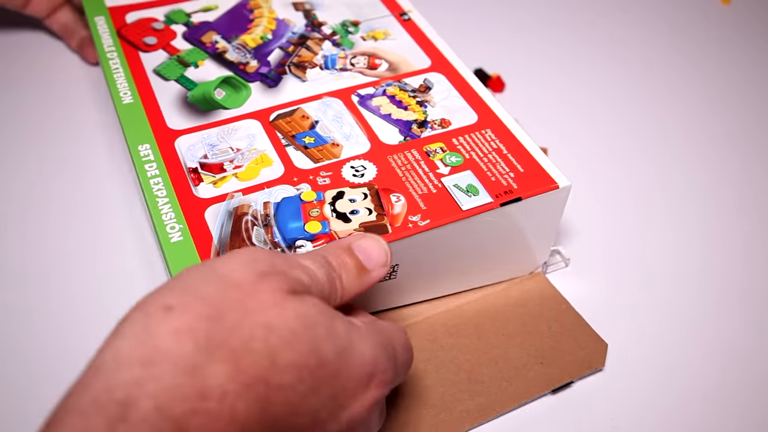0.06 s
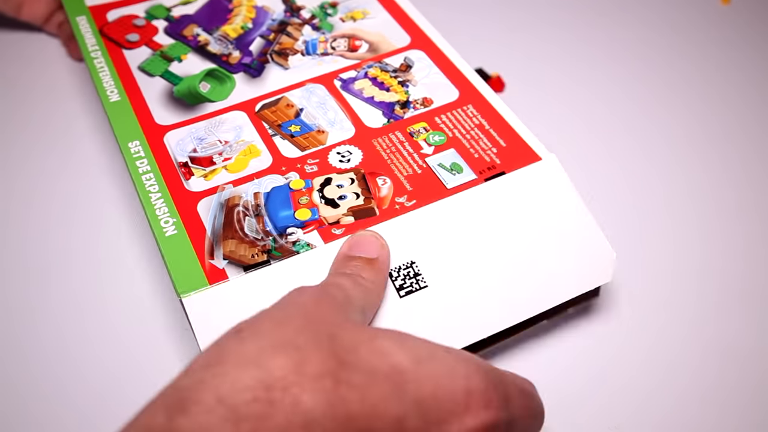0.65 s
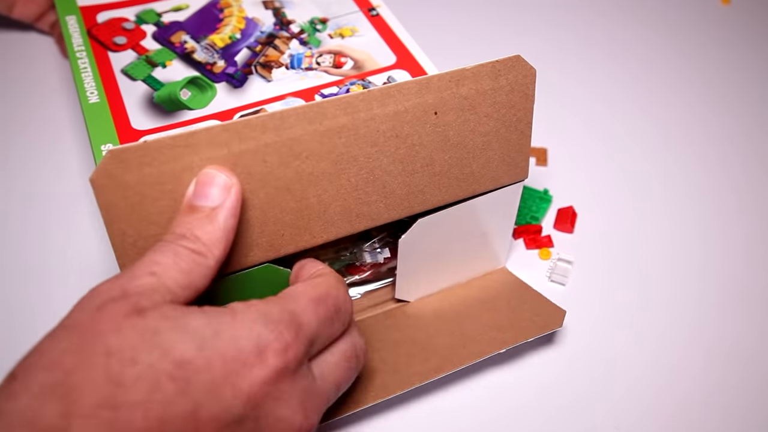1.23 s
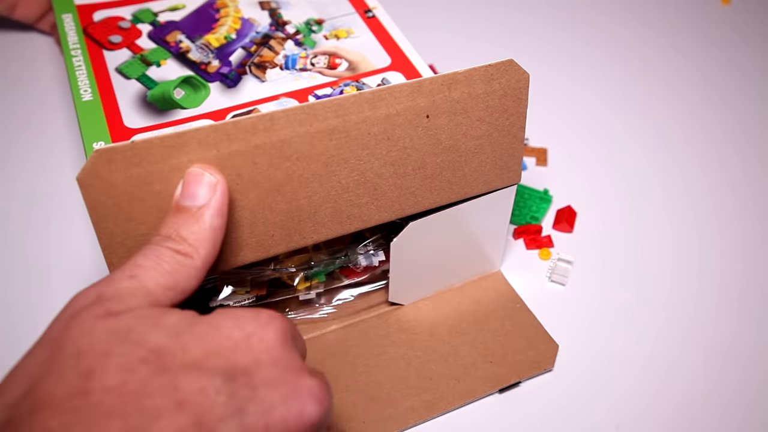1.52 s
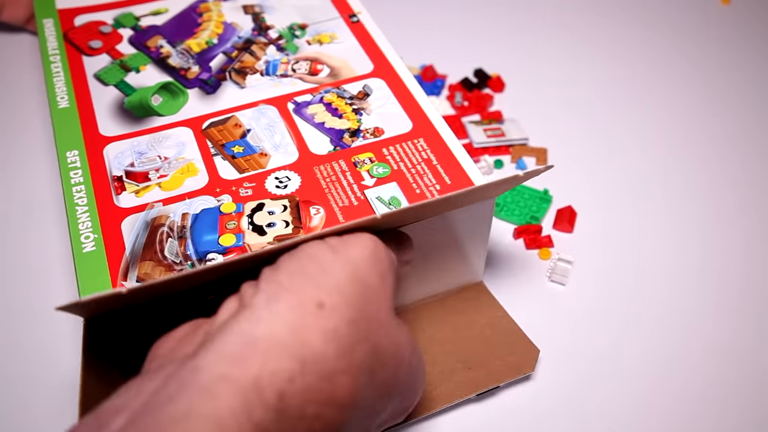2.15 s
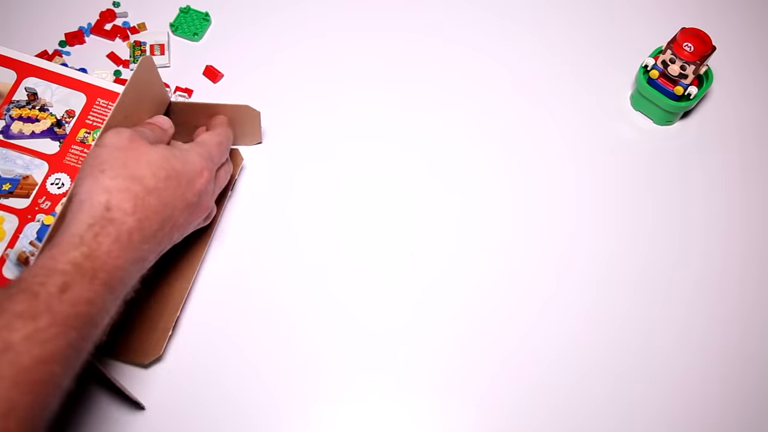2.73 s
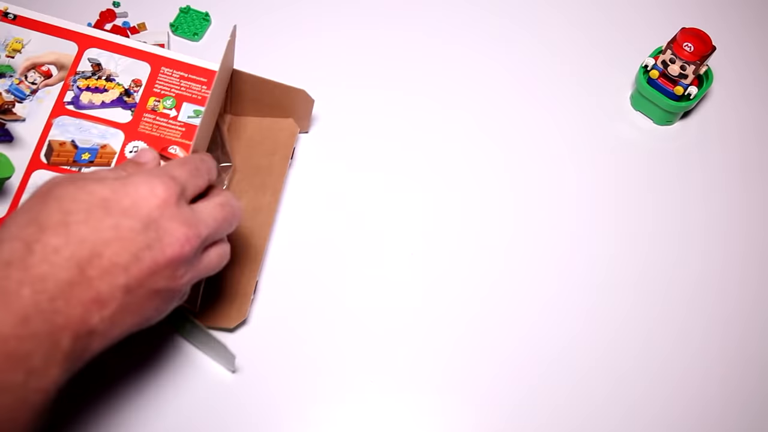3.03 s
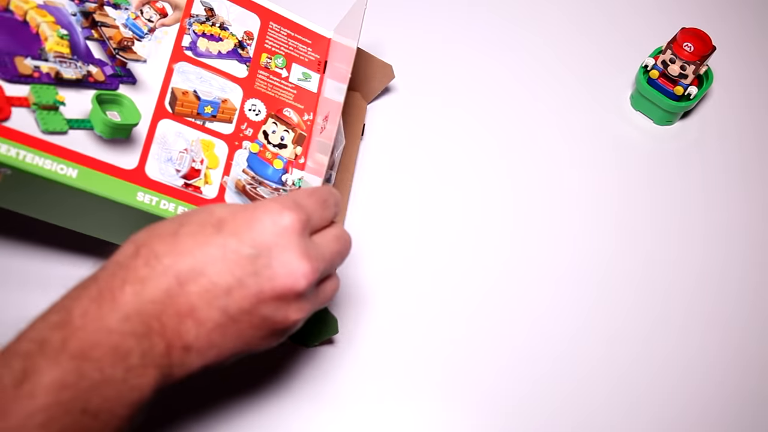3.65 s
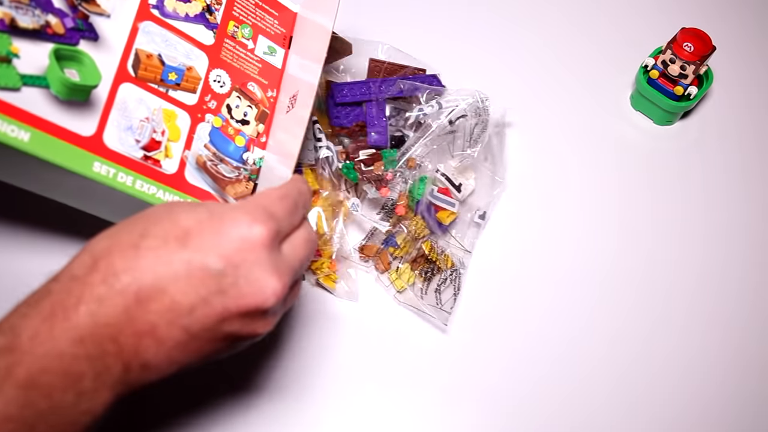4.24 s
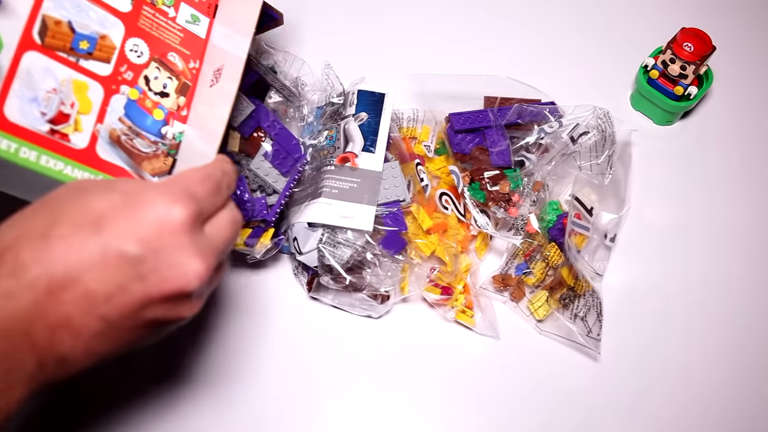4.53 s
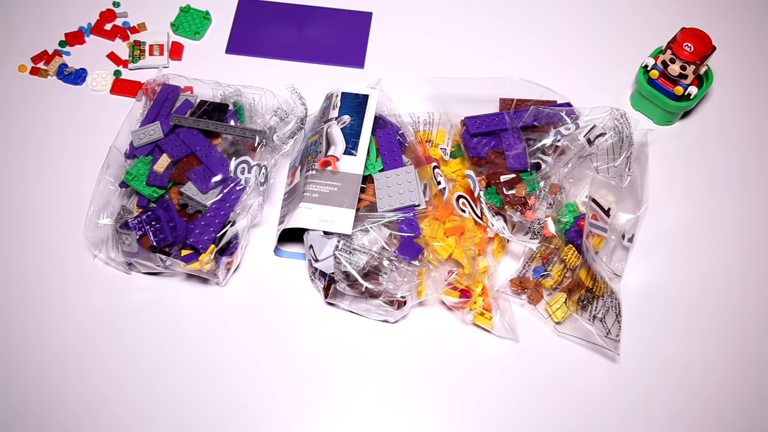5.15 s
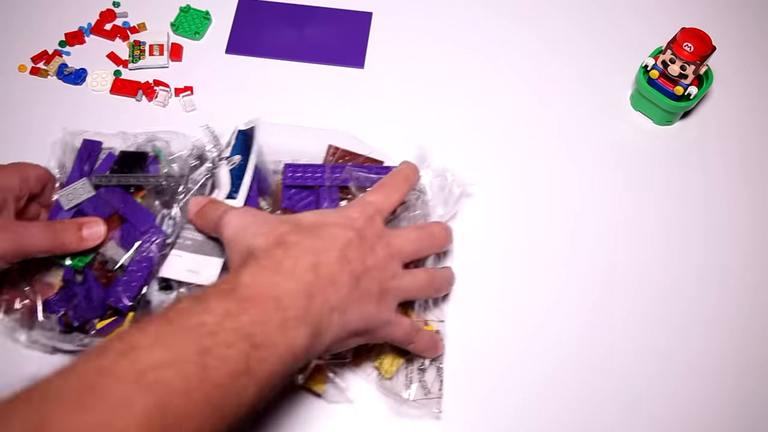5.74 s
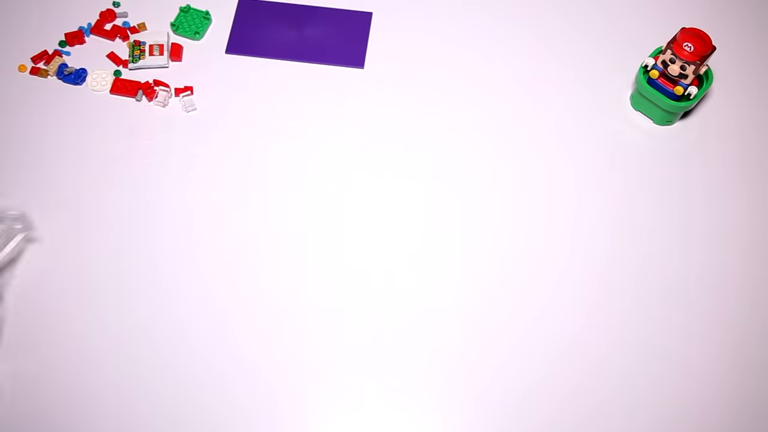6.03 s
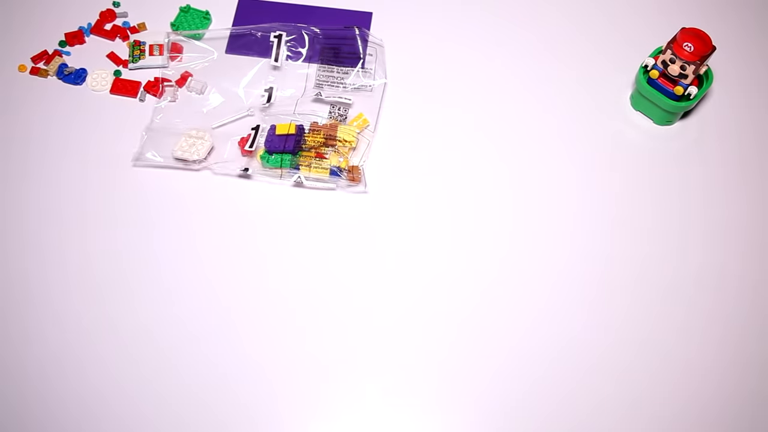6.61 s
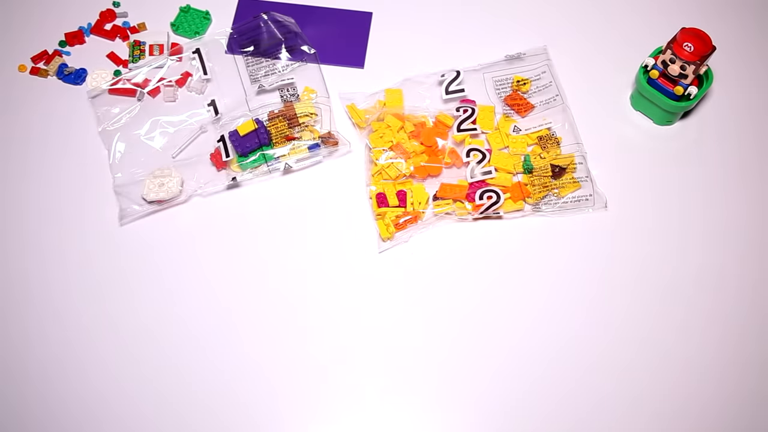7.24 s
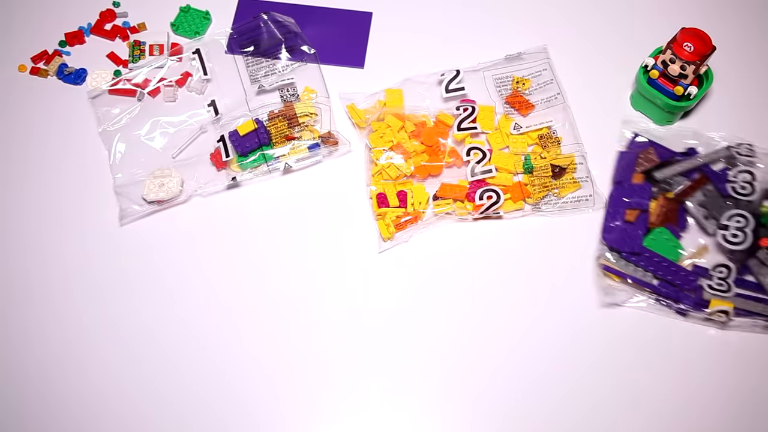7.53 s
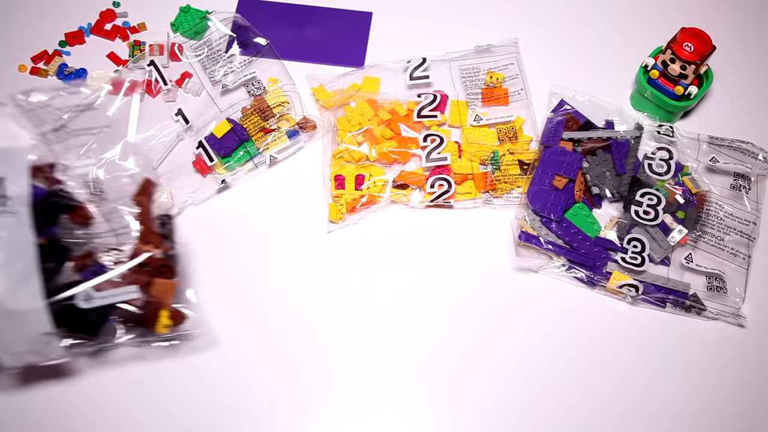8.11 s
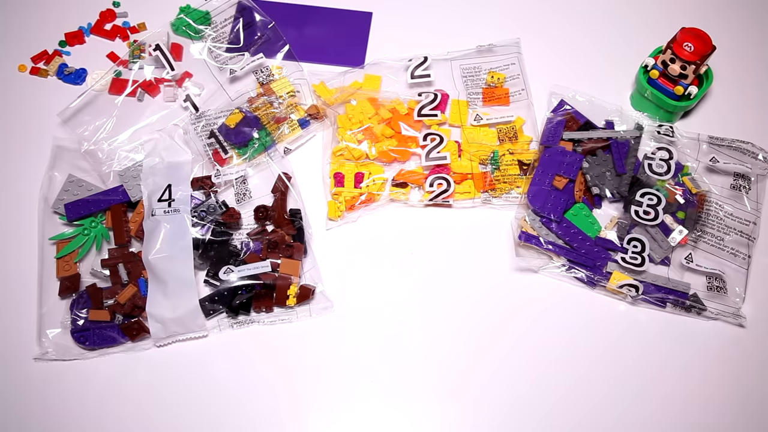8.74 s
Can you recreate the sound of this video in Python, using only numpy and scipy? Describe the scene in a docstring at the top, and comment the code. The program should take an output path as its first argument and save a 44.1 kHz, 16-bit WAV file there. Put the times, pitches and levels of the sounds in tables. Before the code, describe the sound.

For the first three and a half seconds or so, a cardboard box is opened and dragged on a table, close to the microphone. The card scrapes unevenly, with hollow knocks, slight groans and crisp flap snaps, the sharpest near 0.9 seconds. From about 3.7 to 4.9 seconds, plastic bags slide out, crinkling and hissing, with toy bricks ticking inside and two clattering landings. A booklet slaps down at 4.7 seconds, and a loose plastic plate skips lightly around 5. From 5.4 to 6.2 seconds, the bags are swept aside with a bright, crackling rustle. Then five bags drop one by one, at about 6.2, 6.9, 7.5, 8.2 and 8.9 seconds, each a short, sharp burst of clacking bricks, with near quiet and a few tiny settling ticks between. The small bare room adds a short echo to everything.

```python
"""A table in a small bare room: a cardboard box of building bricks is opened and tipped out, close up.
The card sticks and slips as it scrapes, its panels knock and groan, and the flaps snap free.
Crinkling plastic bags slide out, a booklet slaps down, a loose plate skips, and hands sweep up.
Then five bags drop one by one, each a burst of clacking bricks that echoes off the walls."""
import sys
import numpy as np
from scipy import signal
from scipy.fft import rfft, irfft, next_fast_len
from scipy.io import wavfile

SR = 44100
rng = np.random.default_rng(int(sys.argv[2]) if len(sys.argv) > 2 else 0)


def transcribe(signal):
    """Save signal, clipped to [-1, 1], as a 16-bit WAV file at the path in sys.argv[1]."""
    frames = np.atleast_2d(signal).T
    limited = np.clip(frames, -1, 1)
    pcm = np.round(limited * 32767).astype(np.int16)
    wavfile.write(sys.argv[1], SR, pcm)


N = 391166
HZ = np.fft.rfftfreq(4096, 1 / SR)  # frequency axis of the material colours


def amp(db):
    """Decibels to gain."""
    return 10 ** (np.asarray(db) / 20)


def unit(x):
    """Scales to rms 1."""
    return x / np.sqrt(np.mean(x ** 2) + 1e-20)


def curve(points, hz=HZ):
    """Interpolates a table on a log-frequency axis."""
    points_hz, values = np.transpose(points)
    return np.interp(np.log(hz + 1), np.log(points_hz + 1), values)


def add(mix, start_s, sound):
    """Mixes a sound in at its start time."""
    part = mix[max(round(start_s * SR), 0):][:len(sound)]
    part += sound[:len(part)]


def lifts(modes):
    """The dB humps that resonances put on a spectrum."""
    return sum(db / (1 + (2 * (HZ - hz) / width) ** 2) for hz, width, db in modes)


def causal(gain):
    """Minimum-phase impulse response of a gain curve, with energy 1."""
    log_gain = np.log(np.maximum(gain / gain.max(), 1e-5))
    phase = -signal.hilbert(np.r_[log_gain, log_gain[-2:0:-1]]).imag[:len(gain)]
    response = irfft(np.exp(log_gain + 1j * phase))
    return response / np.linalg.norm(response)


def bands(colour_db, edges_hz=(900, 4000)):
    """Splits a colour into hollow lows, middle and sharp highs, each of power 1."""
    low, high = (1 / (1 + (HZ / edge) ** 8) for edge in edges_hz)
    return [unit(amp(colour_db) * np.sqrt(share)) for share in (low, abs(high - low), 1 - high)]


def clicks(per_s, spread_db):
    """Random clicks: most are small, a few are large."""
    size = amp(spread_db * np.minimum(rng.exponential(1, N), 4.5))
    return size * rng.choice([-1, 1], N) * (rng.random(N) < per_s / SR)


def rattle(per_s, spread_db, low_hz, high_hz, t60_s, pieces=24):
    """Many small pieces, each ticking at its own pitch."""
    out = np.zeros(N)
    radius = amp(-60 / (t60_s * SR))
    for hz in np.geomspace(low_hz, high_hz, pieces):
        poles = [1, -2 * radius * np.cos(2 * np.pi * hz / SR), radius ** 2]
        out += signal.lfilter([1, 0, -1], poles, clicks(per_s / pieces, spread_db))
    return unit(out)


def fuzzy_tone(hz, width_hz, envelope):
    """A resonance shaken at random, with the energy of its envelope."""
    n = len(envelope)
    offset_hz = np.fft.fftfreq(next_fast_len(n + SR // 4), 1 / SR)
    phases = 2j * np.pi * rng.random(len(offset_hz))
    wander = np.fft.ifft(np.exp(-(2 * offset_hz / width_hz) ** 2 + phases))[:n]
    carrier = np.exp(2j * np.pi * np.cumsum(hz * np.ones(n)) / SR)
    tone = envelope * (wander * carrier).real
    return tone * np.linalg.norm(envelope) / np.linalg.norm(tone)


def unsteady(grain, patchy_db, wobble_db, patch_hz=260, drift_s=0.035):
    """The contact keeps moving: resonances come and go, and the pressure wobbles."""
    hz, t, spectrum = signal.stft(grain, SR, nperseg=512)
    over_hz, over_s = np.fft.fftfreq(len(hz), hz[1])[:, None], np.fft.fftfreq(len(t), t[1])
    slow = np.exp(-(2 * drift_s * over_s) ** 2)
    gain_db = 0
    for depth_db, breadth in (patchy_db, np.exp(-(2 * patch_hz * over_hz) ** 2)), (wobble_db, over_hz == 0):
        noise = np.fft.fft2(rng.standard_normal(spectrum.shape))
        gain_db += depth_db * unit(np.fft.ifft2(noise * breadth * slow).real)
    return unit(signal.istft(spectrum * amp(gain_db), SR, nperseg=512)[1][:N])


def rub(strokes, grain, colour_db, trim_db, hollow_trim_db=0, swell_db=6.5, ease_db=8.5, grip_s=0.0066):
    """Strokes: grain excites the material; pressure swells to a crest and eases off."""
    drives = np.zeros((3, N))
    for start, length, crest, db, hollow_db, sharp_db in strokes:
        t = np.arange(0, length + grip_s, 1 / SR)
        pressure_db = np.interp(t, [0, crest * length, length], [-swell_db, 0, -ease_db])
        grip = np.clip(np.minimum(t, t[-1] - t) / grip_s, 0, 1)
        for drive, band_db in zip(drives, (hollow_db + hollow_trim_db, 0, sharp_db)):
            add(drive, start, grip * amp(db + pressure_db + band_db))
    textures = [signal.oaconvolve(grain, causal(band))[:N] for band in bands(colour_db)]
    return amp(trim_db) * np.sum(drives * textures, axis=0)


def blows(hits, grain, colour_db, trim_db, ring_db, width_at_3k_hz, crack):
    """Each blow is a first crack and a dying burst of grain, ringing in the struck thing."""
    out, t = np.zeros(N), np.arange(SR // 6) / SR
    for start, db, hollow_db, sharp_db, decay_s, hz in hits:
        burst = grain[rng.integers(N - len(t)):][:len(t)] * np.exp(-t / decay_s)
        burst /= np.linalg.norm(burst)
        burst[0] += crack * np.exp(-decay_s / 0.0082)  # shorter blows get more crack
        ring = lifts([(hz, width_at_3k_hz * np.sqrt(hz / 3000), ring_db)])
        low, middle, top = bands(colour_db + ring)
        gain = np.sqrt((low * amp(hollow_db)) ** 2 + middle ** 2 + (top * amp(sharp_db)) ** 2)
        sound = signal.fftconvolve(burst, causal(gain))
        energy = np.mean(gain ** 2) * decay_s * SR / 2
        add(out, start, amp(db + trim_db) * np.sqrt(energy) * sound / np.linalg.norm(sound))
    return out


# Colour of the room tone: frequency_hz, gain_db
ROOM_TONE_COLOUR = [(25, -8.5), (45, -5.5), (70, 0), (110, -17), (250, -14.5), (600, -22.5), (2000, -14.5),
                    (7000, -17), (15000, -43)]


def room_tone(level_db=-70.5):
    """A faint bed of rumble and hiss."""
    colour = amp(curve(ROOM_TONE_COLOUR, np.fft.rfftfreq(N, 1 / SR)))
    return amp(level_db) * unit(irfft(rfft(rng.standard_normal(N)) * colour, N))


# Colour of cardboard: frequency_hz, gain_db
CARD_COLOUR = [(35, -46), (60, -17.5), (130, -27), (205, -13.5), (290, -5), (480, -5), (700, -8.5),
               (1100, -10), (1700, -7.5), (2300, -10.5), (3500, -7), (6400, -1.5), (8200, -11),
               (10500, -23.5), (15500, -40.5)]
# Resonances of the panels and the air inside: pitch_hz, width_hz, lift_db
BOX_RESONANCES = [(217, 14, 5.5), (491, 65, 5.5), (1655, 190, 3)]
BOX_COLOUR_DB = curve(CARD_COLOUR) + lifts(BOX_RESONANCES)
# Fingers work the flaps, then the box is turned and dragged. Levels are ahead of each layer's trim;
# hollow and sharp are against the mids: start_s, length_s, crest_fraction, level_db, hollow_db, sharp_db
BOX_SCRAPES = [(0, 0.099, 0, -30.5, 0.5, 0.5), (.11, 0.091, 0.1, -32, 0, -2),
               (.2, 0.061, 0.38, -25.5, -5, -8), (.26, 0.2, 0.29, -40.5, 4, -1),
               (.445, 0.078, 0.63, -29, -2, 4), (.55, 0.17, 0.13, -36, -0.5, 6.5),
               (.66, .11, 0.37, -25, -0.5, -8), (.77, 0.062, .2, -34, -3.5, -2),
               (.845, 0.18, 0.38, -33, -7, 5.5), (1.03, 0.15, 0.36, -34.5, -6, 1),
               (1.19, 0.19, 0.95, -31, -5, -4.5), (1.385, 0.14, 0.14, -20, -9.5, -1),
               (1.51, 0.12, 0.47, -23, -9.5, 0.5), (1.62, 0.066, 0.23, -30, 2, -1.5),
               (1.7, 0.16, 0.44, -36.5, -7.5, 1), (1.82, .21, 0.13, -30, -5.5, -4.5),
               (2.02, 0.29, 0.076, -39.5, -1.5, 3.5), (2.29, .12, 0.1, -25.5, -4.5, -3),
               (2.4, 0.18, 0.46, -20.5, -8.5, -1.5), (2.59, 0.13, .55, -19.5, -6, -0.5),
               (2.72, 0.39, 0.57, -33.5, -10, 2), (3, 0.27, 0.41, -29.5, -4.5, -1),
               (3.25, 0.38, 0.19, -30.5, -3, -3), (3.6, 0.24, 0.6, -31.5, -1.5, 0)]


def box_scrapes(grain):
    """Fibres stick and slip under a fine rasp; the hollow box colours both."""
    rasp = unsteady(grain, patchy_db=2.5, wobble_db=1.1)
    return rub(BOX_SCRAPES, rasp, BOX_COLOUR_DB, trim_db=-0.85, hollow_trim_db=-2)


# Bumps and thumps on the box: start_s, level_db, hardness_db, decay_s
BOX_BUMPS = [(.109, -23, -3, .007), (.15, -22.5, -6, .011), (.223, -14.5, -4, .0035),
             (.36, -25.5, -1, .009), (.377, -26.5, -4, .005), (.459, -14, -2.5, .006),
             (.67, -21, -8.5, .02), (.7, -17, 1, .02), (.82, -20, -3, .008), (0.861, -17, -0.5, .012),
             (.895, -25.5, -10.5, .011), (1.191, -23.5, -6.5, .003), (1.209, -24, -1, .005),
             (1.42, -14.5, -2, 0.0015), (1.645, -10.5, -4.5, 0.0063), (2.269, -21, -8, .008),
             (2.676, -20.5, -14, .014)]


def box_knocks(grain, ring_hz=1600):
    """Struck panels: hard knocks click, soft ones boom."""
    hits = [(start, db, -9.5 - 1.27 * hardness_db, hardness_db, decay_s, ring_hz)
            for start, db, hardness_db, decay_s in BOX_BUMPS]
    return blows(hits, grain, BOX_COLOUR_DB, trim_db=-0.9, ring_db=1.5, width_at_3k_hz=600, crack=0.14)


# Rubbed panels groan: start_s, length_s, pitch_hz, glide_hz, width_hz, level_db
PANEL_GROANS = [(.231, 0.23, 214, 77.5, 159, -35.5), (.445, 0.028, 788, 53.5, 91, -23),
                (.446, 0.034, 1527, 51.5, 91, -26.5), (.465, .07, 500, -2.5, 29.55, -35),
                (.55, .07, 512, -9.5, 30.5, -31), (.66, .06, 468, 33.5, 49.9, -24.5),
                (.69, 0.073, 190, -59.5, 110, -35.5), (1.38, .07, 1900, 330.5, 250, -26),
                (1.393, 0.23, 493, -24.5, 130, -35.5), (2.411, .095, 909, -137, 130, -31),
                (2.461, 0.064, 397, 116.5, 150, -27.5), (2.57, 0.081, 467, -23, 128, -27),
                (2.64, .16, 506.4, -9.5, 60, -32), (3.048, 0.17, 2282, -500, 700, -33.5)]
TABLE_RUMBLE = (2.5, 1.8, 42, 0, 40, -60.5)  # under the dragged box, same columns


def box_groans():
    """Rubbed resonances swell, glide and fade."""
    out = np.zeros(N)
    for start, length, hz, glide_hz, width_hz, db in [*PANEL_GROANS, TABLE_RUMBLE]:
        arch = np.sin(np.linspace(0, np.pi, round(length * SR)))
        pitch_hz = np.linspace(hz, hz + glide_hz, len(arch))
        add(out, start, amp(db) * fuzzy_tone(pitch_hz, width_hz, arch))
    return out


def snap(start, db, hz, pivot_hz=3750, hollow_db=-16):
    """One snap as a blow: the smaller the patch that flips, the higher, shorter and sharper it is."""
    sharp_db = 11 * np.log2(hz / pivot_hz)
    middle_db = db - 10 * np.log10(1 + amp(sharp_db) ** 2)
    return start, middle_db, hollow_db, sharp_db, 0.0035 * pivot_hz / hz, hz


def stray_snaps(strokes, above_db, low_hz, high_hz, count, spread_db=10):
    """Each stroke sets off a few small snaps at random, louder under more pressure."""
    return [snap(start + when * length, db + above_db + spread_db * size,
                 low_hz * (high_hz / low_hz) ** pitch)
            for start, length, _, db, _, _ in strokes for when, size, pitch in rng.random((count, 3))]


# Crisp flicks of the flaps: start_s, level_db, pitch_hz
FLAP_FLICKS = [(0.478, -10.5, 5160), (0.544, -6.5, 6440), (0.769, -15.5, 2860), (0.817, -3.5, 3030),
               (0.852, -7, 2880), (0.935, 4, 8700), (0.985, -19.5, 2860), (1.244, -8, 6300),
               (1.282, -10.5, 5070), (1.309, -5.5, 5660), (1.871, -2.5, 4540), (2.028, -14.5, 4650),
               (2.057, -15.5, 6280), (2.133, -8.5, 5940), (2.176, -8, 5330), (2.209, -5, 5950),
               (3.326, -9, 6150), (3.57, -6, 4600)]


def flap_snaps(grain):
    """Flap edges catch and flick free."""
    hits = [snap(*row) for row in FLAP_FLICKS]
    hits += stray_snaps(BOX_SCRAPES, above_db=1, low_hz=3500, high_hz=7000, count=2)
    return blows(hits, grain, BOX_COLOUR_DB, trim_db=-6, ring_db=5.5, width_at_3k_hz=650, crack=0.16)


# Thin pings after sharp knocks: start_s, pitch_hz, width_hz, level_db, t60_s
THIN_PINGS = [(.853, 2880, 165, -20, .37), (.935, 8520, 300, -24, .27), (.975, 2890, 140, -31, .3),
              (5.028, 2008, 350, -31, .11)]


def pings(steady=0.81, rough=0.74):
    """Narrow, slightly rough rings that hang on briefly after a knock."""
    out, t = np.zeros(N), np.arange(SR // 2) / SR
    for start, hz, width_hz, db, t60_s in THIN_PINGS:
        fall = amp(db - 60 * t / t60_s)
        pure = np.sqrt(2) * fall * np.sin(2 * np.pi * hz * t)
        add(out, start, rough * fuzzy_tone(hz, width_hz, fall) + steady * pure)
    return out


# Colour of sliding plastic film: frequency_hz, gain_db
FILM_COLOUR = [(35, -60), (60, -22.5), (135, -23), (272, -2), (305, -6), (453, -2.5), (498, 1.5),
               (830, -11.5), (1020, -0.5), (1320, -3.5), (1710, -1.5), (2150, -8), (5850, -2.5),
               (7730, -6.5), (15500, -44)]
# Bags leave the tipped box: start_s, length_s, crest_fraction, level_db, hollow_db, sharp_db
BAG_SLIDES = [(3.71, .3, 0.57, -25.5, -5.5, -1.5), (4, 0.16, 0.44, -27.5, -2, -1),
              (4.16, 0.27, 0.49, -27, -7.5, 2.5), (4.4, .24, .3, -24, -7, 1), (4.64, .17, .5, -27, -6, 0.5),
              (4.81, .12, 0.13, -38.5, -20, 12.5)]


def bag_slides(grain):
    """Film crinkles and hisses out of the box while the bricks inside tick against each other."""
    rustle = unsteady(grain, patchy_db=1.1, wobble_db=1.17)
    return rub(BAG_SLIDES, rustle, curve(FILM_COLOUR), trim_db=-0.84, hollow_trim_db=2)


# Brighter colour of crackling and swept bags: frequency_hz, gain_db
CRINKLE_COLOUR = [(35, -54.5), (60, -23.5), (123, -29.5), (156, -21.5), (278, -15.5), (359, -17), (423, -7),
                  (599, -11.5), (739, -7), (811, -11.5), (869, -7), (1670, -3.5), (2150, -7), (6730, 3.5),
                  (15500, -32.5)]
# Single crackles and clacks from the bags: start_s, level_db, pitch_hz
CRACKLES = [(3.727, -10.5, 3540), (3.736, -4.5, 4700), (4.103, -6, 6480), (4.134, -1.5, 4110),
            (4.241, -3.5, 5760), (4.335, -8.5, 3170), (4.405, -6.5, 4880), (4.424, -6, 6340),
            (4.685, -8, 3160), (5.364, -9, 4090), (5.397, -10, 6480), (5.417, -3, 5460),
            (5.491, -0.5, 6830), (5.673, -1.5, 5660), (5.753, -7, 7090), (6.109, -3, 4430),
            (6.47, -35, 6600), (6.799, -45.5, 5930), (7.479, -32, 3450), (7.549, 7, 7080),
            (8.288, -20.5, 6200), (8.39, -31, 3600), (8.632, -25.5, 5170)]


def bag_crackles(crinkle):
    """Film buckles; bricks clack and settle."""
    hits = [snap(*row) for row in CRACKLES]
    hits += stray_snaps(BAG_SLIDES + BAG_SWEEPS, above_db=8.5, low_hz=4000, high_hz=7200, count=5)
    colour_db = curve(CRINKLE_COLOUR)
    return blows(hits, crinkle, colour_db, trim_db=-7.5, ring_db=8, width_at_3k_hz=440, crack=0.45)


# Colour of hard plastic on the table: frequency_hz, gain_db
BRICK_COLOUR = [(29, -67.5), (50, -38.5), (192, -28), (275, -24), (579, -21.5), (754, -19), (850, -19.5),
                (958, -15), (1660, -13), (2330, -14), (2960, -8.5), (3340, -7.5), (3860, -5.5), (7030, -1),
                (15500, -33.5)]
# Two landings as the box empties, then five drops:
# start_s, level_db, hollow_db, sharp_db, ring_hz, film_lead_s, far_end_lag_s, far_end_relative_db
BAG_DROPS = [(4.496, -16, 1.5, 2.5, 5700, 0.0087, .012, -8), (4.776, -18, -5, 10.5, 6500, .01, 0.022, -13),
             (6.1822, -12.5, -12, 1, 4000, .012, .0045, -2), (6.8883, -14, -9.5, 8, 5930, .041, 0.023, -5),
             (7.5386, -16.5, -9, 9, 5900, 0.025, .04, -3.5), (8.2024, -12, -12, 6, 6270, .016, 0.026, -10),
             (8.854, -14, -5.5, 2, 5000, 0.0031, 0.015, -7)]


def bag_landings(impact_decay_s=0.0094, tumble_decay_s=0.016):
    """The film brushes the table; then dozens of bricks hit it within a few hundredths of a second."""
    bricks = rattle(per_s=6000, spread_db=0.5, low_hz=1210, high_hz=10000, t60_s=0.011)
    grain = unit(bricks + 1.3 * unit(clicks(per_s=5500, spread_db=3)))
    brushes, hits = [], []
    for start, db, hollow_db, sharp_db, hz, lead_s, lag_s, far_db in BAG_DROPS:
        loose = hollow_db - 7.5, sharp_db + 2.5  # brick on brick: less table, more treble
        brushes.append((start - lead_s, lead_s, 0.1, db, hollow_db, sharp_db))
        hits += [(start, db, hollow_db, sharp_db, impact_decay_s, hz),  # the near end hits
                 (start + lag_s / 2, db - 8, *loose, tumble_decay_s, hz),  # bricks tumble
                 (start + lag_s, db + far_db, *loose, impact_decay_s, hz)]  # the far end flops down
    colour_db = curve(BRICK_COLOUR)
    film = rub(brushes, grain, colour_db, trim_db=-26)
    clacks = blows(hits, grain, colour_db, trim_db=-1.57, ring_db=3.5, width_at_3k_hz=520, crack=0.18)
    return film + clacks


# The booklet lands: start_s, level_db, hollow_db, sharp_db, decay_s, ring_hz
BOOKLET_FALL = [(4.7345, -13, -4.5, -21, 0.021, 1205)]


def booklet_slap(grain):
    """Paper falls flat with a broad midrange smack."""
    colour_db = curve(CARD_COLOUR)
    return blows(BOOKLET_FALL, grain, colour_db, trim_db=-1, ring_db=17, width_at_3k_hz=3300, crack=2.8)


# Resonances of the loose plate: pitch_hz, width_hz, lift_db
PLATE_RESONANCES = [(2200, 600, 12), (3686, 330, 4), (4500, 430, 8.5), (5670, 300, 10.5), (6470, 342, 11.5),
                    (8200, 440, 2.5)]
# The plate clatters on the table: start_s, level_db, bounce_gap_s, loss_per_bounce_db
PLATE_SKIPS = [(4.9439, -28, .011, 1), (5.028, -24.5, .02, 4.5)]


def plate_clatter(bounces=4, hollow_db=-24.5, sharp_db=5.5, decay_s=0.0095, notch_hz=5640):
    """A stiff plastic plate skips on its edges, each bounce weaker; its modes die almost at once."""
    hits = [(start + k * gap_s, db - k * loss_db, hollow_db, sharp_db, decay_s, notch_hz)
            for start, db, gap_s, loss_db in PLATE_SKIPS for k in range(bounces)]
    colour_db = curve(BRICK_COLOUR) + lifts(PLATE_RESONANCES)
    noise = rng.standard_normal(N)
    return blows(hits, noise, colour_db, trim_db=5.5, ring_db=-8, width_at_3k_hz=400, crack=0.42)


# Hands push the bags aside: start_s, length_s, crest_fraction, level_db, hollow_db, sharp_db
BAG_SWEEPS = [(5.35, .04, 1, -39, -1.5, 4), (5.38, 0.2, 0.19, -22.5, -10, 4.5),
              (5.575, 0.29, 0.083, -25, -11.5, 3), (5.781, .24, 0.84, -28.5, -18.5, 5.94),
              (6, 0.22, .25, -28, -10.5, 6.9)]


def bag_sweeps(grain):
    """Film hisses over the table, with bricks ticking inside."""
    rustle = unsteady(grain, patchy_db=3.5, wobble_db=1.4)
    return rub(BAG_SWEEPS, rustle, curve(CRINKLE_COLOUR), trim_db=-2.2, hollow_trim_db=2.5)


# Reverb time of the bare room: frequency_hz, t60_s
ROOM_DECAY = [(150, 0.92), (400, 0.856), (1040, 0.817), (2760, 0.79), (7000, 0.66), (10000, 0.51),
              (15000, 0.42)]
# Colour of the reverb tail: frequency_hz, gain_db
TAIL_COLOUR = [(60, -16.5), (200, -0.5), (500, 0), (1500, 3), (3000, 0.5), (6500, -1.5), (12000, 1.5)]


def room(direct, tail_db=-12, early_db=-17, build_s=0.0067, turn_hz=110, tails=4):
    """A few early reflections off table and walls, then a tail whose treble dies first."""
    out, time = direct.copy(), np.arange(N) / SR
    reflection = amp(early_db) * np.convolve(direct, [0.3, 0.4, 0.3])
    for delay_s in np.geomspace(0.003, 0.025, num=6):
        add(out, delay_s * rng.uniform(0.9, 1.1), rng.choice([-1, 1]) * reflection)
    # successive clicks start from different spots, so they take turns in feeding different tails
    for k in range(tails):
        send = np.maximum(np.sin(2 * np.pi * (turn_hz * time + k / tails)), 0)
        hz, t, noise = signal.stft(rng.standard_normal(SR), SR, nperseg=256)
        fade_db = curve(TAIL_COLOUR, hz)[:, None] - 60 * t / curve(ROOM_DECAY, hz)[:, None]
        tail = signal.istft(noise * amp(fade_db), SR, nperseg=256)[1]
        tail *= 1 - np.exp(-(np.arange(len(tail)) / SR / build_s) ** 2)
        out += amp(tail_db) * signal.oaconvolve(direct * send, tail / np.linalg.norm(tail))[:N]
    return out


def scene():
    """Grains of card, film and bricks drive the action on the table, heard in the room."""
    fibres = unit(unit(clicks(per_s=1800, spread_db=3)) + 0.876 * rng.standard_normal(N))
    box = box_scrapes(fibres) + box_groans() + box_knocks(fibres) + flap_snaps(fibres)
    booklet = booklet_slap(fibres)
    crinkle = unit(unit(clicks(per_s=900, spread_db=2)) + 0.6 * rng.standard_normal(N))
    ticks = rattle(per_s=630, spread_db=0, low_hz=2280, high_hz=10016, t60_s=0.0076)
    full_bag = unit(crinkle + 0.5 * ticks)
    bags = bag_slides(full_bag) + bag_sweeps(full_bag) + bag_crackles(crinkle) + bag_landings()
    return (room(box + booklet + bags + plate_clatter() + pings()) + room_tone())[None]


def record(dry, cutoff_hz=15750):
    """Any clack above full scale clips; a steep low-pass takes off the very top."""
    lowpass = signal.firwin(511, cutoff_hz, window=("kaiser", 9), fs=SR)
    return signal.oaconvolve(np.clip(dry, -1, 1), lowpass[None], "same")


dry = scene()
out = record(dry)
transcribe(out)
```